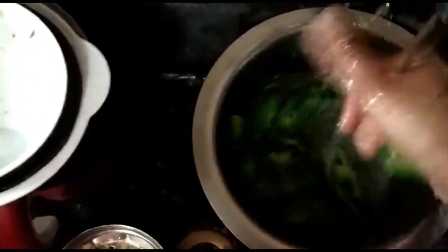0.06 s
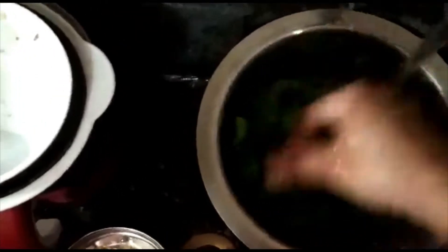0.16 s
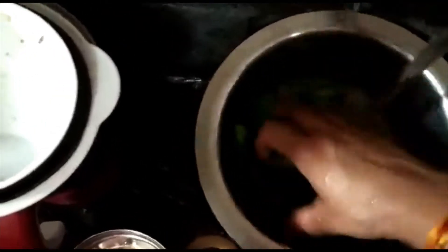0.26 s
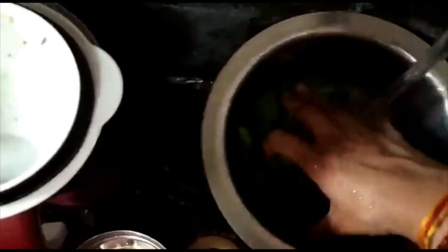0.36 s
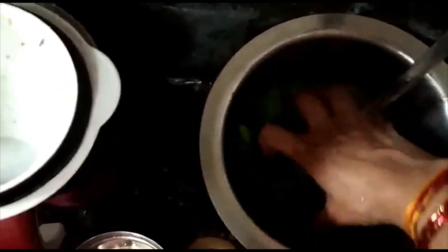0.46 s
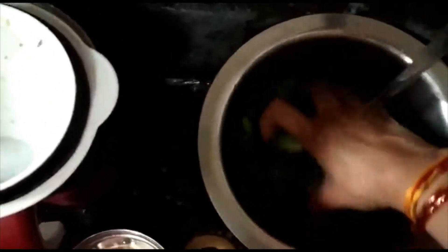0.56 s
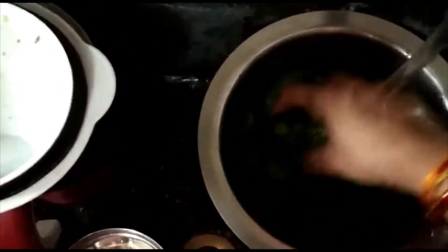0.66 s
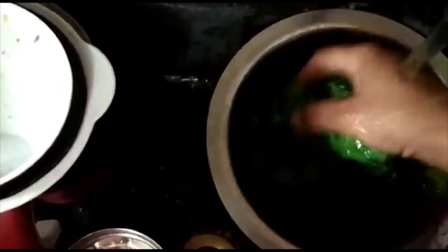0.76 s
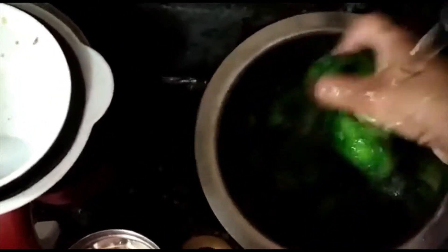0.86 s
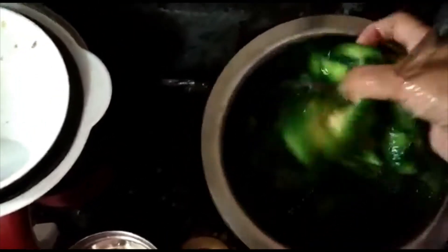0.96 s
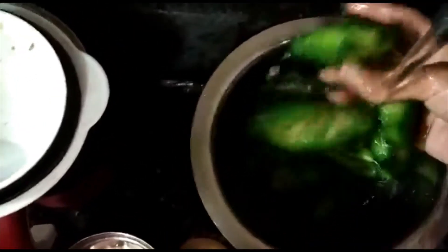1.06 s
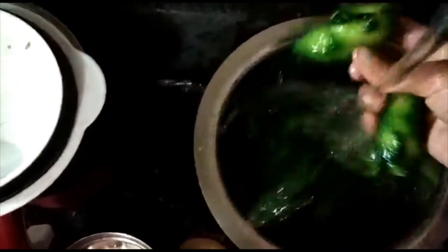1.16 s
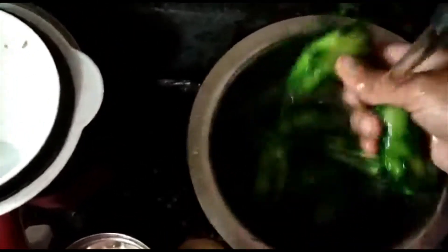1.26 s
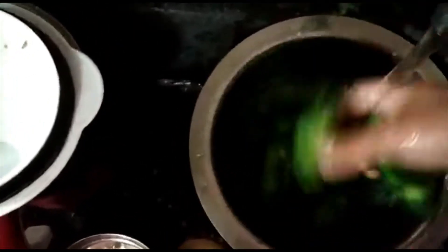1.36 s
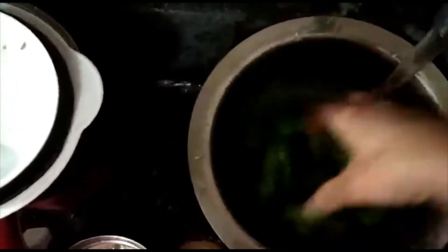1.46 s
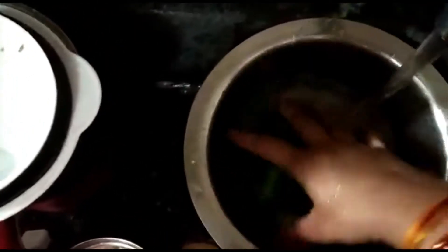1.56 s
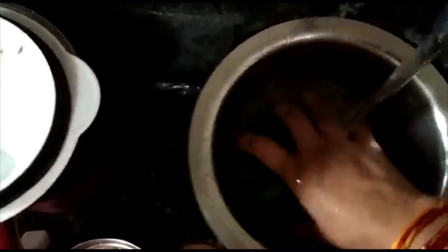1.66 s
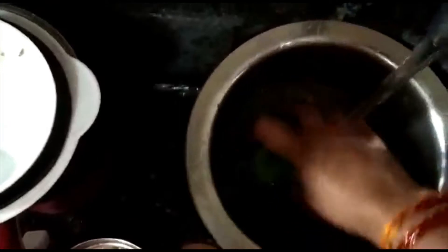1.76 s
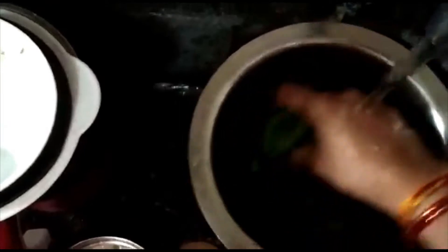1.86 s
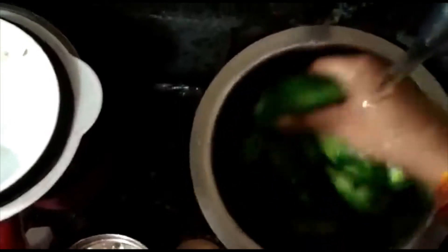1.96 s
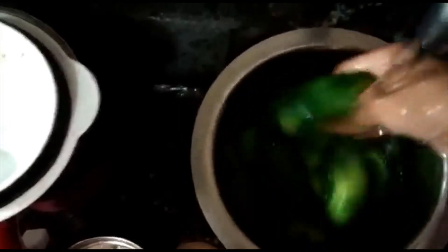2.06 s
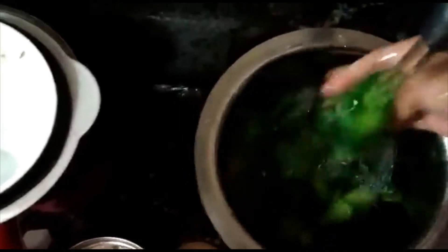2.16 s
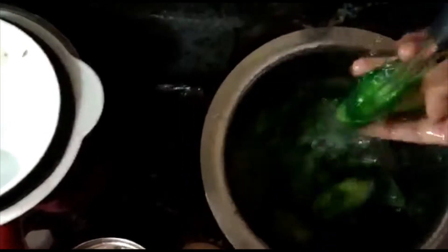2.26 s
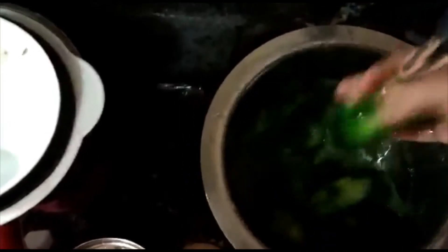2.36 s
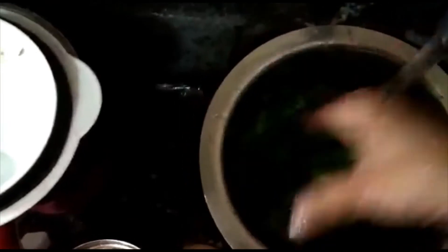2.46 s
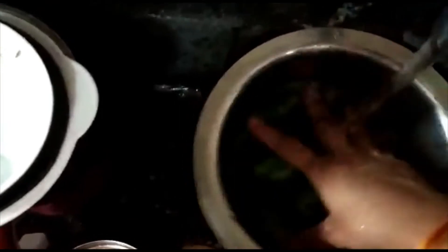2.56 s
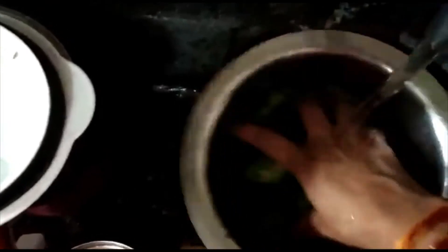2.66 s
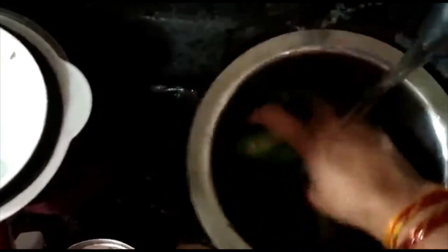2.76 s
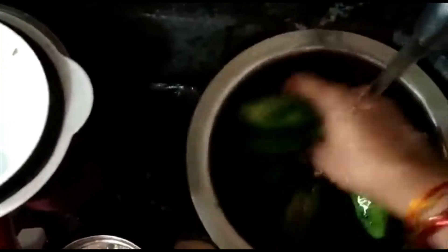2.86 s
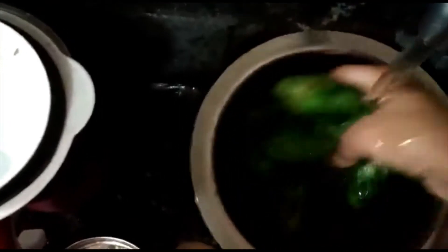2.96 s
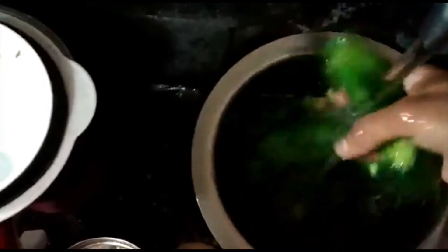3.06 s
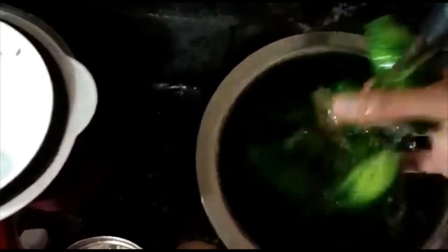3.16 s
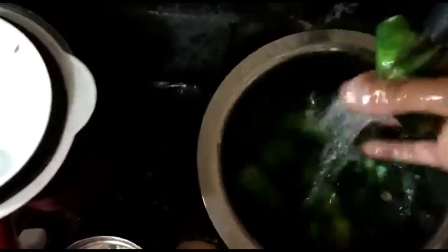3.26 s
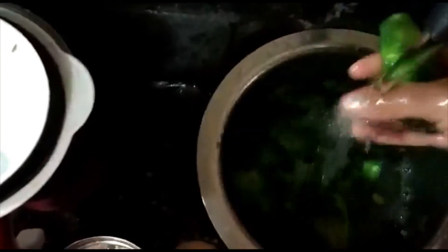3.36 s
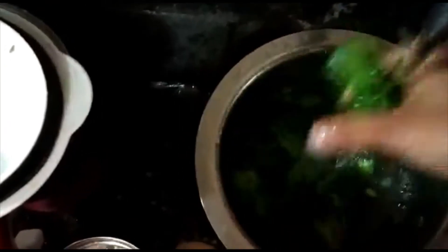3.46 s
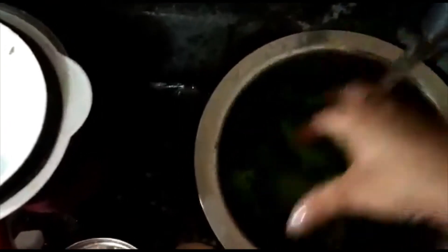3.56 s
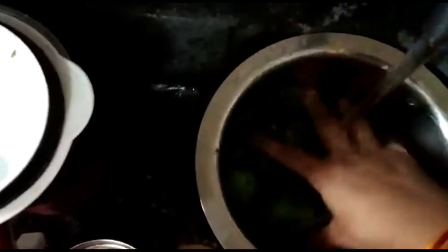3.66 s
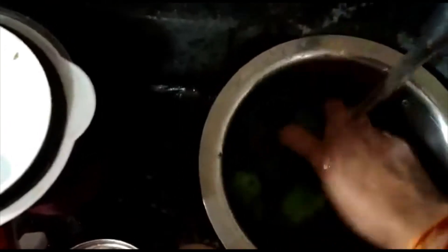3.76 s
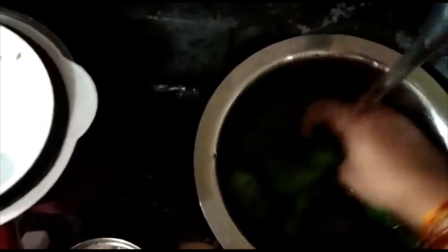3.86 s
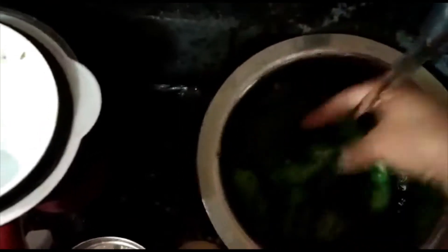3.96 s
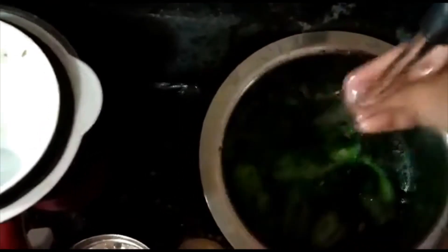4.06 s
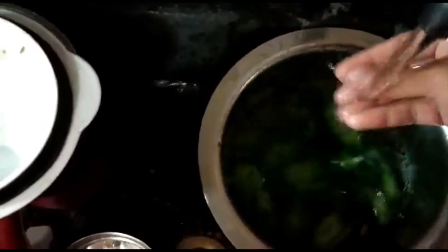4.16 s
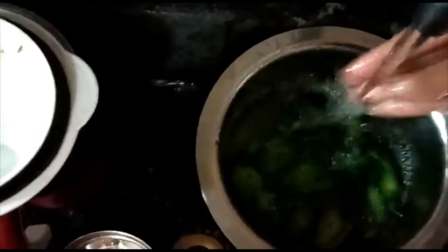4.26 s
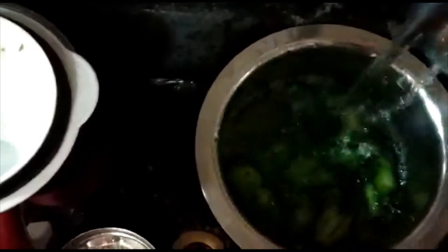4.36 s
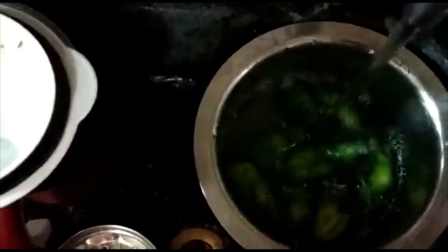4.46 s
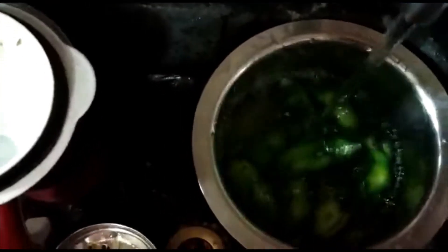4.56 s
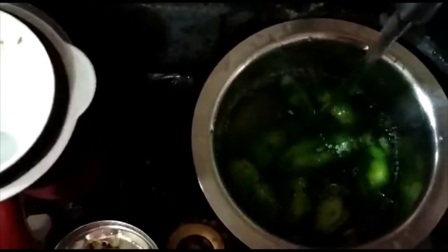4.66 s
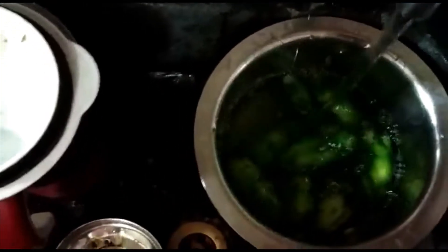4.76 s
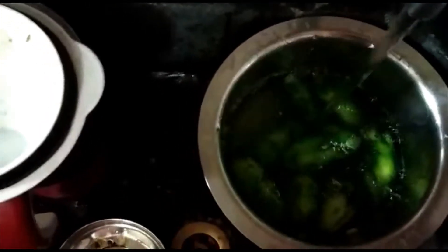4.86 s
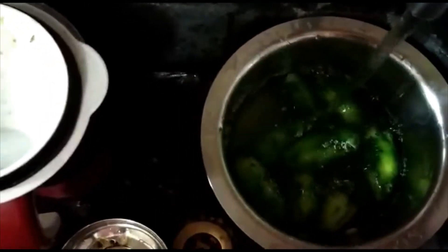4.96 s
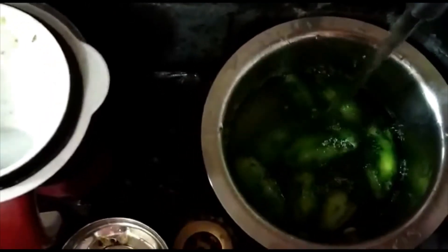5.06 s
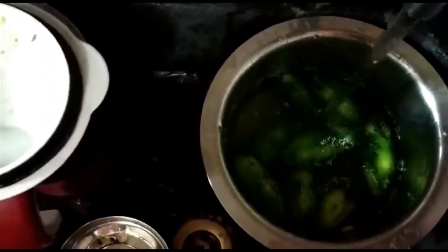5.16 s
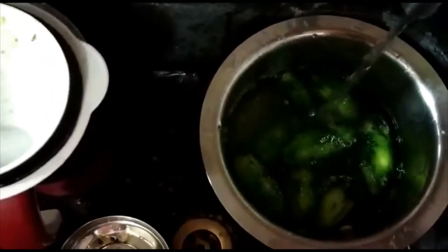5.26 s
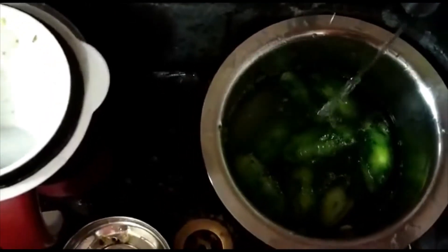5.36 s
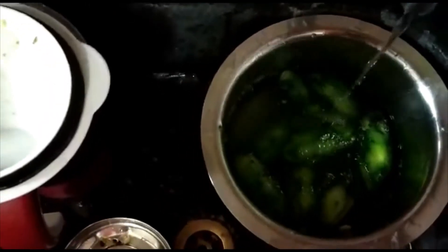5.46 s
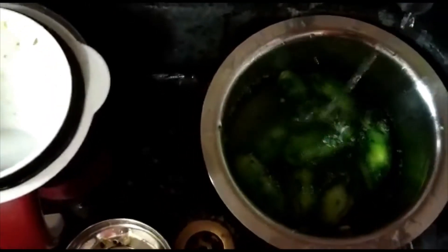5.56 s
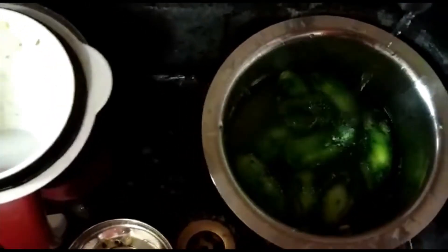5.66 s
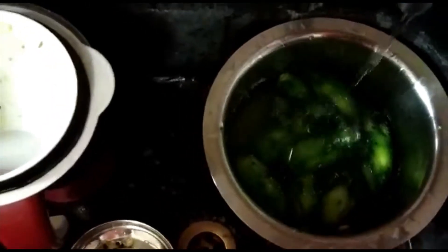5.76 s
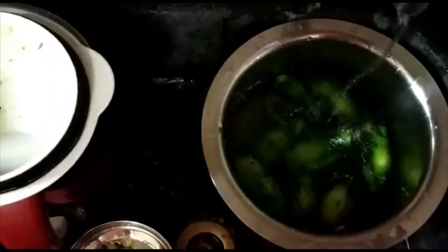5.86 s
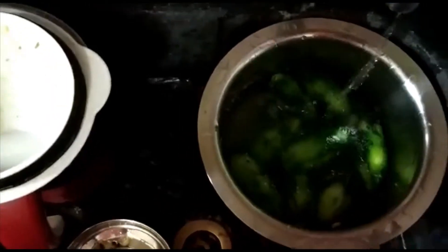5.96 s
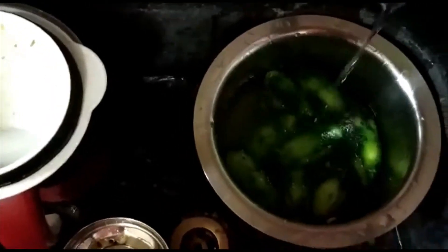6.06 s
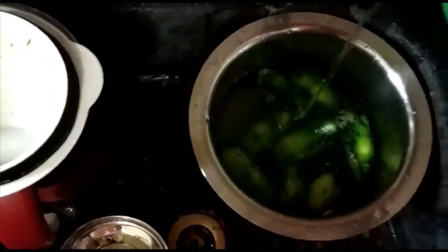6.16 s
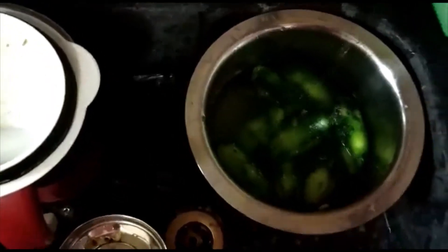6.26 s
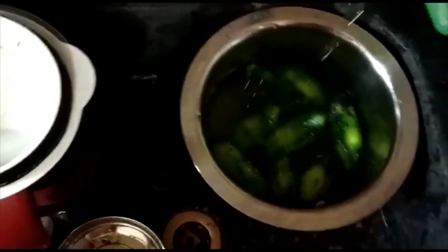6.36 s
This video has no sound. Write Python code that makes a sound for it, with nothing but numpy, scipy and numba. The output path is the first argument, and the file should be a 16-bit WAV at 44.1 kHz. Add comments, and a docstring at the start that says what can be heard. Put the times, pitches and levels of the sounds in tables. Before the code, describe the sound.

Close stereo sound of vegetables being rinsed by hand in a water-filled steel bowl in a kitchen, with a tap running. From 0 s bubbles gurgle, then from 0.3 to 0.8 s there is a flurry of splashes and wet slaps. After a brief lull, scoops resume around 1.1 to 1.5 s. At about 1.74 s a strong, dull, hollow thud comes with a soft ring of the bowl. Stirring goes on in bursts from 2.2 s; at 2.8 to 3.0 s a sharp splash, bright tinks and the clearest metallic ringing stand out. Sloshing, plops and spray continue to about 4.4 s, then fade. The rest is much quieter: thin tap hiss, fizzing bubbles, single plinking drips, hollow low drumming from 4.7 to 5.5 s, a sputter near 5.4 s, near calm around 5.8 s, and sparse bright spatters from 6 s, ending with a light tick at 6.33 s. A low steady rush lies beneath.

```python
"""Water stirred by a hand that rinses green vegetables in a steel bowl under a running tap, close by in a kitchen.
Each scoop throws spray and stirs up bubbles: swarms of short sines that climb in pitch, with noise bursts
for the slaps. Bumps set the bowl ringing as a few dying tones. After about 4.5 s the hand is gone and
the tap runs on: hissing noise, spurts of drops and a hollow drumming on the floating vegetables.
Close echoes from the steel, a short room tail and a low steady rush lie around it."""
import sys
import numpy as np
from scipy import signal
from scipy.fft import rfft, irfft, next_fast_len
from scipy.io import wavfile
from numba import njit

SR = 44100
rng = np.random.default_rng(int(sys.argv[2]) if len(sys.argv) > 2 else 0)


def wav_out(sig):
    """Save sig, one row per channel (or a flat mono array), as 16-bit PCM at SR to the path in sys.argv[1]."""
    wavfile.write(sys.argv[1], SR, np.round(np.clip(np.atleast_2d(sig).T, -1, 1) * 32767).astype(np.int16))


N = 283122
TIME = np.arange(N) / SR
PORT_LAG_S = .00038   # longest delay between the left and right ports, the two places where sound is picked up
LEFT_RIGHT = np.array([[1], [-1]])


def from_db(db):
    """Turn decibels into gain."""
    return 10 ** (np.asarray(db) / 20)


def rms_one(x):
    """Scale to an rms (average strength) of 1."""
    return x / np.sqrt(np.mean(x ** 2) + 1e-20)


def at_hz(points, hz):
    """Read a (pitch_hz, value) table between its points, on a log-frequency axis."""
    table_hz, value = np.transpose(points)
    return np.interp(np.log(np.maximum(hz, 1)), np.log(table_hz), value)


def coloured(x, points, share=1):
    """Filter x with this share of a smooth (pitch_hz, level_db) curve."""
    size = next_fast_len(N + 4096)
    gain = from_db(share * at_hz(points, np.fft.rfftfreq(size, 1 / SR)))
    return irfft(rfft(x, size) * gain, size)[..., :N]


def drift(per_s):
    """Smooth random curve of rms 1 with per_s random points a second, joined by lines."""
    knots = rng.standard_normal(4096)
    return rms_one(np.interp(TIME * per_s, np.arange(len(knots)), knots))


def resonate(x, hz, width_hz):
    """Pass x through one resonance with a gain of about 1 at its top."""
    r = np.exp(-np.pi * width_hz / SR)
    feed = np.array([1, 0, -1]) * (1 - r * r) / 2
    feedback = [1, -2 * r * np.cos(2 * np.pi * hz / SR), r * r]
    return signal.lfilter(feed, feedback, x + 1e-18)


def high_pass(x, hz):
    """Take out what lies below hz."""
    return signal.sosfilt(signal.butter(2, hz, "high", fs=SR, output="sos"), x + 1e-18)


def add(out, s, sound):
    """Mix a sound in at time s."""
    at = max(int(s * SR), 0)
    part = sound[..., :max(N - at, 0)]
    out[..., at:at + part.shape[-1]] += part


def add_placed(out, s, sound, place):
    """Mix a sound in from a place: at 1 it reaches the left port first, at -1 the right."""
    add(out[0], s - place * PORT_LAG_S / 2, sound)
    add(out[1], s + place * PORT_LAG_S / 2, sound)


def surging(rows, column, churn_db, fall_s, rise_s=0.019):
    """Strength over time: each surge swells, holds until its length is over and dies away; powers add to the churn."""
    power, t = np.zeros(N) + from_db(churn_db) ** 2, TIME[:SR // 2]
    for s, length, *levels in rows:
        swell = np.minimum(t / rise_s, 1) * np.exp(-np.maximum(t - length, 0) / fall_s)
        add(power, s, (from_db(levels[column]) * swell) ** 2)
    return np.sqrt(power)


def slops(per_s=90, spread_db=3, fall_s=.006, floor=.4):
    """Gain of water landing in separate slops: each is sudden and dies fast, over a steady share; about rms 1."""
    lands = (rng.random(N) < per_s / SR) * from_db(spread_db * rng.standard_normal(N)) ** 2
    power = signal.lfilter([1], [1, -np.exp(-1 / (fall_s * SR))], lands + 1e-18)
    return np.sqrt(floor + (1 - floor) * power / power.mean())


@njit
def ring_bubbles(length, start, gain, step, cycles, rise):
    """Add up dying sines, each climbing in pitch; start and gain hold one column per port."""
    out = np.zeros((2, length))
    for k in range(len(step)):
        life = int(cycles[k] * 2 * np.pi / step[k]) + 2   # samples until it is 60 dB down
        turn = np.exp(1j * step[k] - np.log(1000) / life)
        climb = np.exp(1j * step[k] * rise / life)
        z = 1 + 0j
        for i in range(life):
            z *= turn
            turn *= climb
            for port in range(2):
                if 0 <= start[k, port] + i < length:
                    out[port, start[k, port] + i] += gain[k, port] * z.imag
    return out


# How bubbles of different pitch compare in strength
# columns: pitch_hz [Hz], level_db [dB per Hz]
WATER_COLOUR = [(59, -57), (100, -27), (140, -17), (277, -17.5), (381, -10.5), (560, -16), (691, -17),
                (1060, -3), (1650, -5), (2420, -3), (3400, -4.5), (4570, -4), (6420, -5.5), (15000, -7.5),
                (16000, -2)]


def bubbles(low_hz, high_hz, per_s, cycles, rise, spread_db=4.4, clump_db=2.2):
    """A swarm of bubbles of random size, pitch and place; bigger ones ring louder, not lower, and clumps ring
    louder still; rms 1."""
    chance = rng.random((80000, 7))[:max(int(per_s * N / SR), 50)]
    when, pitch, size, place, sign, facing, damping = chance.T
    hz = low_hz * (high_hz / low_hz) ** pitch
    at, ports = (when * N).astype(int), np.array([-1, 1])
    size_db = spread_db * np.minimum(-np.log(1 - size), 3) + clump_db * drift(90)[at]
    gain = from_db(size_db + at_hz(WATER_COLOUR, hz)) * hz * np.sign(sign - .5)
    # each bubble reaches the ports at its own delay and balance
    start = at[:, None] + (ports * (place[:, None] - .5) * PORT_LAG_S * SR).astype(int)
    gains = gain[:, None] * (1 + ports * (facing[:, None] - .5))
    # ringing lasts from half to twice the given cycles
    swarm = ring_bubbles(N, start, gains, 2 * np.pi * hz / SR, cycles * 2 ** (2 * damping - 1), float(rise))
    return rms_one(high_pass(high_pass(swarm, low_hz / 2), low_hz / np.sqrt(2)))


# How hard the water churns between strokes
# columns: time_s [s], thrown_drops_db [dB], trapped_air_db [dB]
CHURN = [(0, -26, -25), (.25, -25, -34), (.5, -33, -34), (.8, -32, -31), (1.03, -28, -31), (1.5, -36, -42),
         (1.9, -24.5, -28), (2.1, -31, -38), (2.42, -33, -35.5), (3.0, -28.5, -29), (3.5, -28.5, -32),
         (3.65, -28.5, -40), (3.95, -32, -30.5), (4.35, -31, -52), (4.6, -38.5, -43.5), (5.2, -40.5, -41),
         (5.8, -57, -58), (6.42, -37, -56)]
# The hand pushes, lifts or lets fall a mass of water
# columns: start_s [s], length_s [s], thrown_drops_db [dB], dragged_air_db [dB], slosh_db [dB]
STROKES = [(0.0, 0.01, -44, -19, -37), (0.09, 0.027, -38, -40, -62), (0.278, 0.055, -20.5, -36, -37.5),
           (0.34, 0.12, -27.5, -30, -67), (0.424, 0.059, -22.5, -21.5, -32),
           (0.527, 0.068, -28.5, -25, -43), (0.592, 0.05, -23, -21, -39), (0.655, 0.04, -26, -20.5, -32),
           (0.918, 0.085, -33, -30, -42.5), (1.073, 0.1, -30, -31, -40.5),
           (1.285, 0.086, -43, -25.5, -35.5), (1.347, 0.035, -19.5, -24, -43),
           (1.409, 0.049, -33, -27, -49), (1.526, 0.033, -22, -27, -38), (1.582, 0.099, -31.5, -29, -38.5),
           (1.688, 0.039, -23.5, -17, -34), (1.723, 0.1, -30.5, -50, -32.5),
           (1.832, 0.056, -22.5, -21, -36.5), (1.904, 0.088, -33, -22.5, -47), (2.104, 0.12, -25, -29, -68),
           (2.232, 0.054, -26, -30.5, -65), (2.405, 0.12, -29, -35, -58), (2.518, 0.048, -23, -36, -37.5),
           (2.575, 0.065, -25, -27, -58), (2.621, 0.07, -20, -24, -37.5), (2.718, 0.044, -29, -24, -30),
           (2.797, 0.12, -26, -20.5, -35.5), (2.925, 0.12, -49, -27.5, -47), (2.991, 0.14, -28.5, -34, -39),
           (3.151, 0.06, -24, -25, -43), (3.23, 0.06, -22.5, -36, -42), (3.349, 0.099, -23, -25, -40.5),
           (3.55, 0.033, -27.5, -50, -46.5), (3.707, 0.047, -27, -25, -37),
           (3.768, 0.11, -25, -32.5, -42.5), (3.875, 0.092, -26.5, -30, -40),
           (3.991, 0.17, -56, -31, -41.5), (4.128, 0.075, -25, -36, -42), (4.207, 0.12, -26, -36.5, -41.5),
           (4.379, 0.1, -25, -37, -50)]
# The tap spurts and its jet breaks up (drumming plays these too)
# columns: start_s [s], length_s [s], thrown_drops_db [dB], dragged_air_db [dB], drumming_db [dB]
SPURTS = [(4.675, 0.046, -55, -61, -36.5), (4.73, 0.077, -65, -59, -42.5), (4.979, 0.17, -50, -61, -44.5),
          (5.208, 0.032, -52, -41, -41), (5.286, 0.073, -38, -43, -37.5), (5.38, 0.12, -29, -44.5, -40),
          (5.488, 0.058, -32.5, -69, -62), (5.661, 0.066, -35, -43, -41.5), (5.982, 0.021, -23, -54, -57),
          (6.016, 0.085, -37.5, -43.5, -44), (6.261, 0.045, -31, -39, -38)]
# Bubbles and drops by size
# columns: low_hz [Hz], high_hz [Hz], rate_per_s [1/s], ringing_cycles [typical cycles to fall 60 dB],
# pitch_rise [share of pitch], level_db [dB], air_share [0 follows thrown drops, 1 trapped air]
SWARMS = [(600, 2400, 220, 28, .1, -10, 1), (810, 2825, 1400, 42, .08, -3.8, 1),
          (2804, 4600, 1400, 110, .015, -5.5, .69), (4584, 7000, 1400, 130, .005, -5.5, .27),
          (6900, 15600, 5000, 26, .013, -1, 0)]
# Lone droplets that stand out of the thrown water
# columns: low_hz [Hz], high_hz [Hz], rate_per_s [1/s], ringing_cycles [typical cycles to fall 60 dB],
# pitch_rise [share of pitch], level_db [dB]
DROPLETS = [(1500, 6000, 170, 20, .04, -12.5), (3500, 14000, 140, 9, 0, -11.5)]


def water(slosh_db=-0.5, tumble_db=1.3, tumble_per_s=45):
    """Stirred water: the biggest bubbles follow the slosh, middle ones the trapped air, tiny ones the thrown drops."""
    s, *columns = np.transpose(CHURN)
    drops_db, air_db = [np.interp(TIME, s, level) for level in columns]
    drops = slops() * surging(STROKES + SPURTS, column=0, churn_db=drops_db, fall_s=.018)
    air = surging(STROKES + SPURTS, column=1, churn_db=air_db, fall_s=.013)
    # between strokes the slosh takes on 0.63 of the churn's swing in dB
    slosh = surging(STROKES, column=2, churn_db=-26 + .63 * air_db, fall_s=.02)
    out = from_db(slosh_db) * slosh * bubbles(140, 800, per_s=1300, cycles=14, rise=.15)
    for low_hz, high_hz, per_s, cycles, rise, db, air_share in SWARMS:
        # each size comes and goes on its own as the water tumbles
        level = from_db(db + tumble_db * drift(tumble_per_s))
        strength = air ** air_share * drops ** (1 - air_share)
        out += level * strength * bubbles(low_hz, high_hz, per_s, cycles, rise)
    for low_hz, high_hz, per_s, cycles, rise, db in DROPLETS:
        out += from_db(db) * drops * bubbles(low_hz, high_hz, per_s, cycles, rise)
    return out


# Water slapping on hand, vegetables and surface
# columns: start_s [s], level_db [dB, relative], air_pitch_hz [Hz], air_weight_db [dB], fade_s [s]
SPLASHES = [(0.306, -14, 4300, 2.5, 0.08), (0.344, -4.5, 2340, 0, 0.062), (0.345, -5, 4700, 2.5, 0.025),
            (0.396, -14.5, 4630, 10, 0.027), (0.454, -4.5, 2370, -7, 0.01), (0.4915, -7, 2610, 1.5, 0.043),
            (0.497, -0.5, 4950, 2, 0.012), (0.6, -22, 4300, 4, 0.046), (0.645, 4, 2880, -21, 0.043),
            (0.833, -4, 5750, 0, 0.0042), (1.132, -16.5, 4050, 8, 0.011), (1.279, -3.5, 3570, -7.5, 0.062),
            (1.299, 1.5, 5740, -7, 0.016), (1.401, -5, 3000, -8, 0.039), (1.531, -6.5, 7950, -15, 0.23),
            (1.681, 4.5, 2400, -18, 0.023), (1.812, -12.5, 6100, 17, 0.0043), (1.843, 8, 1920, -9, 0.015),
            (1.928, -3, 4420, -7, 0.023), (2.196, -21, 4420, 4, 0.024), (2.335, 4, 7340, -16, 0.0089),
            (2.499, -13, 3000, 3, 0.014), (2.567, -2, 5960, -15, 0.013), (2.638, -5.5, 2330, -1, 0.013),
            (2.704, -13, 2450, -19, 0.029), (2.803, -16, 2450, 0, 0.0091), (2.809, 14, 4440, -6, 0.0057),
            (2.844, 5, 4500, -5, 0.018), (2.867, 4.5, 2520, -8, 0.012), (3.076, 6, 2560, -11, 0.0062),
            (3.118, -8, 2570, -3, 0.17), (3.251, -8, 4030, 0, 0.02), (3.336, 0.5, 7780, -21, 0.026),
            (3.349, -6.5, 2600, 0, 0.041), (3.435, 1, 8800, -3, 0.016), (3.571, -2.5, 5170, -27, 0.03),
            (3.659, -11, 7060, -22, 0.012), (3.857, 5, 9300, -8, 0.0082), (4.126, -5, 2120, -13, 0.063),
            (4.215, -13, 4560, 4, 0.0089), (4.268, -7, 5700, -10, 0.024), (4.395, -10.5, 3620, -5.5, 0.037),
            (4.46, -19, 7310, 6, 0.031), (5.199, -23, 11000, 4, 0.038), (5.399, -13, 3800, -1.5, 0.012),
            (5.414, -9.5, 5440, 3, 0.015), (5.43, -12, 5000, -9, 0.0077), (5.454, -21, 4450, 9, 0.015),
            (5.563, -17, 9900, -3, 0.019), (5.996, -27, 3460, 3, 0.022), (6.032, -21, 2320, 0, 0.02),
            (6.076, -18, 3480, 2, 0.01), (6.102, -7.5, 9000, -9, 0.013), (6.23, -21.5, 6400, 7.5, 0.008),
            (6.285, -22, 2580, -5, 0.012), (6.331, -20, 890, -3.5, 0.021)]


def splashes(rise_s=0.0032, sharpness=4, spray_db=-13, pocket_db=-5, spray_hz=4000):
    """A slap bursts into fine spray, while the air caught under it fizzes around one pitch."""
    out, t = np.zeros((2, N)), TIME[:SR // 6]
    for s, db, hz, weight_db, length in SPLASHES:
        spray, fizz = rng.standard_normal((2, 2, len(t)))
        # the steel wall reflects each slap from another distance and hollows its tone
        delay = int(rng.uniform(.0003, .0014) * SR)
        spray = rms_one(spray + .8 * np.roll(spray, delay, axis=1))
        burst = from_db(db) * (1 - np.exp(-t / rise_s)) * np.exp(-t / max(length, .002))
        pocket = from_db(pocket_db + weight_db) * rms_one(resonate(fizz, hz, hz / sharpness)) / 2
        add(out, s, burst * (from_db(spray_db) * high_pass(spray, spray_hz) + pocket))
    return out


# Single drops smacking close by
# columns: start_s [s], level_db [dB, relative], pitch_hz [Hz], fade_s [s]
SMACKS = [(0.0815, -6, 1850, .003), (0.4634, -14, 4800, .006), (0.4893, -4.5, 9840, .006),
          (0.6085, -8, 11600, .005), (0.6514, -8, 3190, .004), (1.205, -14, 6800, .004),
          (1.269, -12, 8300, .004), (1.434, -11, 2600, .004), (1.5374, -14, 13000, .006),
          (1.692, -9, 4430, .008), (2.3261, -14, 12900, .002), (2.3426, -10, 13400, .005),
          (2.4796, -8, 7100, .003), (2.518, -2.5, 3670, .0045), (2.6177, -4, 4370, .0018),
          (2.7205, -4.5, 9500, .002), (2.7974, -11.5, 12000, .005), (2.843, -1.5, 4600, .005),
          (3.067, -3.5, 5850, .003), (3.667, -7, 10000, .006), (3.901, -6, 9900, .0012),
          (4.271, -12, 6000, .002), (4.358, -11, 9200, .0025), (4.418, -13, 9000, .003),
          (4.472, -14, 7250, .004), (5.034, -22, 9200, .004), (5.461, -16, 4600, .004),
          (5.5268, -15, 11400, .005), (5.686, -20, 5000, .005), (5.9833, -12, 10300, .004),
          (6.035, -21, 3400, .004), (6.0915, -19, 13000, .005), (6.1414, -20, 13100, .004),
          (6.2925, -15, 10500, .005), (6.294, -16, 3000, .005), (6.3055, -14, 4700, .004),
          (6.3275, -6.5, 4900, .004)]


def smacks(ring_db=3, crack_db=-7, crack_hz=4500, rise_s=.0005):
    """A drop hits with a tiny bright crack and a short ping."""
    out, t = np.zeros((2, N)), TIME[:SR // 25]
    for s, db, hz, length in SMACKS:
        swell = (1 - np.exp(-t / rise_s)) * np.exp(-t / length)
        hit = from_db(db) * rng.standard_normal((2, len(t))) * swell
        crack = from_db(crack_db) * high_pass(hit, crack_hz)
        ping = from_db(ring_db) * resonate(hit, hz, hz / 7)
        add(out, s, crack + ping)
    return out


# Single big bubbles
# columns: start_s [s], level_db [dB, relative], pitch_hz [Hz]
PLOPS = [(0.012, -24, 1190), (0.081, -12, 1810), (0.116, -12, 2120), (0.133, -15, 2300), (0.208, -14, 1444),
         (0.45, -16, 700), (0.547, -19, 733), (0.664, -15, 734), (0.71, -17.5, 1084), (0.749, -20, 914),
         (0.784, -19.5, 554), (0.819, -19, 1210), (0.991, -25, 725), (1.075, -36, 690), (1.204, -21, 1870),
         (1.3, -15.5, 1330), (1.368, -23.5, 725), (1.43, -12.5, 2460), (1.471, -23, 1110),
         (1.605, -16.5, 1920), (1.99, -31, 698), (2.194, -18.5, 1380), (2.347, -19, 876),
         (2.433, -21, 1144), (2.517, -26, 723), (2.645, -21, 1090), (3.009, -15.5, 2620), (3.015, -22, 686),
         (3.064, -13.5, 1150), (3.105, -24, 676), (3.131, -16, 1160), (3.387, -12.5, 953),
         (3.419, -14, 1440), (3.728, -16, 975), (3.755, -25, 904), (3.825, -22, 1250), (3.853, -11.5, 1170),
         (3.89, -22, 805), (4.01, -17.5, 860), (4.063, -15, 2120), (4.227, -25.5, 1110),
         (4.527, -23.5, 1304), (4.699, -35, 850), (4.775, -27, 840), (5.023, -30, 810), (5.082, -30, 840),
         (5.15, -35, 814), (5.293, -35, 497), (5.43, -41, 835), (5.485, -36, 850), (6.075, -35, 690)]


def plops(cycles=20, rise=0.072, ring_db=-4.5, froth_db=-8, froth_s=0.012, froth_sharpness=2.8):
    """A big bubble rings and climbs in pitch as it nears the surface, in a brief froth of bubbles of about its size."""
    out, t = np.zeros((2, N)), TIME[:SR // 6]
    places = rng.uniform(-.8, .8, len(PLOPS))
    for (s, db, hz), place in zip(PLOPS, places):
        age = t * hz / cycles   # the ring falls 20 dB in this many cycles, whatever the bubble's size
        swell = 1 - np.exp(-t * hz)
        phase = 2 * np.pi * np.cumsum(hz * (1 + rise * (np.minimum(age, 1) - .2))) / SR
        add_placed(out, s, from_db(db + ring_db - 20 * age) * swell * np.sin(phase), place)
        width = hz / froth_sharpness
        froth = resonate(resonate(rng.standard_normal((2, len(t))), hz, width), hz, width)
        add(out, s, from_db(db + froth_db) * rms_one(froth) * swell * np.exp(-t / froth_s))
    return out


# Dull blows of vegetables, hand and jet on the water
# columns: start_s [s], level_db [dB, relative], pitch_hz [Hz]
THUDS = [(0.294, -24, 704), (0.436, -28, 408), (0.453, -16, 714), (0.49, -22, 272), (0.55, -23.5, 426),
         (0.665, -18, 406), (0.988, -27, 397), (1.147, -32, 458), (1.704, -24, 400), (1.737, 8, 915),
         (1.741, -3.5, 397), (1.751, -1, 663), (2.514, -21, 454), (2.746, -16, 685), (2.747, -15, 442),
         (3.103, -24, 374), (3.387, -13, 378), (3.667, -17, 624), (3.947, -22, 273), (4.691, -12.5, 391),
         (4.752, -17.5, 404), (5.005, -22, 386), (5.08, -18.5, 384), (5.102, -23, 374), (5.147, -21.5, 380),
         (5.232, -37, 393), (5.255, -28, 418), (5.293, -16.5, 352), (5.351, -23.5, 374),
         (5.401, -16.5, 380), (5.419, -15.5, 378), (5.438, -22, 382), (5.463, -20, 387), (5.488, -18, 400),
         (5.831, -27, 387), (5.935, -28.5, 295), (6.053, -24, 381), (6.253, -23, 387), (6.28, -15.5, 567),
         (6.329, -25, 650)]


def thuds(cycles=19, pocket_db=-7.5, overtone=2.105, overtone_db=-7, churn_db=-19.0, churn_s=0.004,
          churn_hz=750, low_hz=220):
    """A trapped air pocket gives a few low cycles and an overtone, with a brief churn of the water."""
    out, t = np.zeros((2, N)), TIME[:SR // 6]
    places = rng.uniform(-.7, .7, len(THUDS))
    for (s, db, hz), place in zip(THUDS, places):
        phase = 2 * np.pi * hz * t
        tones = np.sin(phase) + from_db(overtone_db) * np.sin(overtone * phase)
        pocket = tones * from_db(-60 * t * hz / cycles) * (1 - np.exp(-2 * t * hz))
        churn = resonate(rng.standard_normal((2, len(t))), churn_hz, churn_hz * 2)
        churn = rms_one(resonate(churn, churn_hz, churn_hz * 2)) * np.exp(-t / churn_s)
        add_placed(out, s, from_db(db + pocket_db) * pocket, place)
        add(out, s, from_db(db + churn_db) * churn)
    return high_pass(out, low_hz)


# The hand plunges in and a big pocket of air gulps downwards in pitch
# columns: start_s [s], level_db [dB, relative], first_pitch_hz [Hz], last_pitch_hz [Hz]
GULPS = [(.295, -33, 280, 190), (.59, -27, 300, 200), (1.655, -30, 280, 200), (1.728, -29, 260, 150),
         (2.19, -34, 270, 190), (2.675, -31, 280, 190), (2.748, -25, 380, 95), (2.785, -28, 160, 105),
         (3.385, -34, 240, 140)]


def gulps(glide_s=0.021, fade_s=0.0089, rise_s=0.004):
    """A large air pocket opens out behind the hand: a short, low, falling note."""
    out, t = np.zeros((2, N)), TIME[:SR // 5]
    for s, db, first_hz, last_hz in GULPS:
        hz = last_hz + (first_hz - last_hz) * np.exp(-t / glide_s)
        note = np.sin(2 * np.pi * np.cumsum(hz) / SR)
        add(out, s, from_db(db) * (1 - np.exp(-t / rise_s)) * np.exp(-t / fade_s) * note)
    return out


# Resonances of the bowl that colour the stirred water and splashes
# columns: pitch_hz [Hz], width_hz [Hz], level_db [dB, against the plain sound]
HOLLOW = [(359, 26, -1.5), (692, 52, 6.5), (840, 25, -3), (1262, 52, -9), (2167, 370, 0), (2470, 24, -5),
          (2704, 45, 5.5), (3157, 46, -3.5), (4120, 130, -5), (4550, 76, 4.5), (4960, 41, 2),
          (5950, 110, -3.5), (7100, 72, -23), (8710, 130, -10), (9460, 200, -10), (9990, 150, -6),
          (10500, 220, -13), (11650, 110, -13)]


def bowl_hollow(wet, level_db=-4.5):
    """The bowl strengthens or cancels some pitches: resonances are added to the plain sound."""
    ringing = sum(from_db(db) * resonate(wet, hz, width) for hz, width, db in HOLLOW)
    return from_db(level_db) * (wet + ringing)


# Vegetables bumping the steel wall
# columns: start_s [s], level_db [dB], first_pitch [factor at the bump],
# last_pitch [factor once the water at the wall has swung back]
BUMPS = [(0.33, -31, 1.02, 1.06), (0.69, -25, 1.08, 1.03), (1.742, -20, 1.05, 1.01), (1.85, -21, 1.04, 1.0),
         (1.94, -23.5, 1.0, .99), (2.874, -12.5, .995, 1.005), (3.015, -18.5, 1.03, 1.09),
         (3.2, -27, 1.01, 1.0), (3.86, -34, 1.0, 1.0)]
# The wall of the filled bowl (wash plays it too)
# columns: pitch_hz [Hz], bumped_db [dB], fade_60db_s [s], bend_share [0-1 of the water's pitch bend], washed_db [dB]
BOWL = [(1039, -1.5, .45, 1, -8), (1104, -9, .45, 1, -11), (1880, -15, .4, .3, -8), (2185, -6, .55, .3, -1),
        (2476, -10, .45, .2, 0), (2748, -13, .6, .2, -.5)]


def bowl(waver=.006, swell_s=.038, swing_s=.09, flutter_db=2.1, rough=.24, rough_per_s=90):
    """Soft bumps ring the steel wall; the swaying water bends its low modes most, and lapping roughens every tone."""
    out, t, sway = np.zeros((2, N)), TIME[:SR], drift(45)
    for hz, mode_db, t60, bend_share, _ in BOWL:
        mode = np.zeros((2, N), complex)
        for s, db, first, last in BUMPS:
            pitch = last + (first - last) * np.exp(-t / swing_s)
            bend = (pitch * (1 + waver * np.interp(s + t, TIME, sway))) ** bend_share
            # higher modes can reach the two ports further out of step
            apart = LEFT_RIGHT * np.pi * hz * PORT_LAG_S * rng.uniform(0, 1 / 2)
            level = from_db(db + mode_db - 60 * t / t60) * (1 - np.exp(-t / swell_s))
            phase = 2 * np.pi * np.cumsum(hz * bend) / SR + apart
            add(mode, s, level * np.exp(1j * phase))
        lapping = 1 + rough * np.array([drift(rough_per_s) + 1j * drift(rough_per_s) for port in range(2)])
        out += np.imag(mode * lapping) * from_db(flutter_db * drift(40.35))
    return out


# Water pours off the hand down the steel wall and keeps it singing
# columns: start_s [s], length_s [s], level_db [dB]
WASHES = [(.35, .14, -41), (1.845, .16, -35), (2.63, .06, -39), (2.83, .12, -34.5), (3.0, .3, -36.5),
          (3.36, .08, -37), (3.75, .25, -43)]


def wash(width_hz=38, fall_s=0.051, side=0.95):
    """Running water keeps nudging the modes of the wall, so each sings as a narrow, restless band."""
    song = np.zeros((2, N))
    for hz, _, _, _, db in BOWL:
        nudges = rng.standard_normal((2, N))
        song += from_db(db) * rms_one(resonate(resonate(nudges, hz, width_hz), hz, width_hz))
    mid, apart = rms_one(song)
    level = surging(WASHES, column=0, churn_db=-83, fall_s=fall_s)
    return level * (mid + side * apart * LEFT_RIGHT)


# Light hard taps on the steel rim, and bangles on the wrist clinking (2.862 and 2.876 s) # columns: start_s
# [s], level_db [dB], loudest_pitch_hz [Hz]
TINKS = [(2.8445, -19, 4700), (2.862, -25, 9500), (2.876, -24.5, 8600), (6.3285, -24, 5000)]
# The high modes of the rim and the bangles # columns: pitch_hz [Hz], level_db [dB]
HIGH_MODES = [(4480, -10), (4996, -6.5), (6030, -18), (7310, 0), (8470, -2), (9210, -6), (9950, -1), (11800, -7)]


def tinks(spread_octaves=.3, t60_s=.27):
    """A tap or clink rings the high steel modes, most of all those near one pitch."""
    out, t = np.zeros((2, N)), TIME[:SR // 3]
    for s, db, centre_hz in TINKS:
        for hz, mode_db in HIGH_MODES:
            weight = np.exp(-(np.log2(hz / centre_hz) / spread_octaves) ** 2 / 2)
            ring = from_db(db + mode_db - 60 * t / t60_s) * np.sin(2 * np.pi * hz * t)
            add_placed(out, s, weight * ring, rng.uniform(-1, 1))
    return out


# The colour of the tap's smooth jet
# columns: pitch_hz [Hz], level_db [dB per Hz, relative]
TAP_COLOUR = [(250, -30), (500, -5), (1500, -4), (2600, -7.5), (4500, -4.5), (7000, -3.5), (11000, -1.5),
              (16000, 0)]


def tap(hiss_db=-38, fizz_db=-47.5, sputter_db=0.5, pan_db=1):
    """The jet hisses as it enters the water and trails an uneven fizz of small ringing bubbles."""
    pan = from_db(pan_db * LEFT_RIGHT / 2)   # the jet lands nearer the left port
    hiss = rms_one(coloured(rng.standard_normal((2, N)), TAP_COLOUR))
    fizz = bubbles(low_hz=2400, high_hz=15000, per_s=900, cycles=70, rise=.01)
    fizz = rms_one(from_db(sputter_db * drift(25)) * fizz)
    return pan * (from_db(hiss_db) * hiss + from_db(fizz_db) * fizz)


# The air pocket that the jet drives in among the vegetables
# columns: pitch_hz [Hz], width_hz [Hz], level_db [dB, relative]
JET_POCKET = [(388.6, 23, 9.5), (850, 100, -1.5), (1170, 200, -9.5)]


def drumming(per_s=500, idle_db=-56, fall_s=0.016, level_db=-3.0, gurgle_db=-6, side=0.7):
    """Beads of the broken jet make the air pocket under it ring hollowly; loose bubbles gurgle off it."""
    beads = rng.standard_normal((2, N)) * (rng.random(N) < per_s / SR)
    mid, apart = rms_one(sum(from_db(db) * resonate(beads, hz, width) for hz, width, db in JET_POCKET))
    pocket = mid + side * apart * LEFT_RIGHT
    gurgle = bubbles(low_hz=253, high_hz=690, per_s=120, cycles=10, rise=.15)
    level = from_db(level_db) * surging(SPURTS, column=2, churn_db=idle_db, fall_s=fall_s)
    return level * (pocket + from_db(gurgle_db) * gurgle)


# Stray drops from the tap fall into open water
# columns: start_s [s], level_db [dB], pitch_hz [Hz], ringing_cycles [cycles to fall 25 dB],
# slap_db [dB against the ring]
DRIPS = [(4.676, -24, 2930, 35, -5), (4.676, -22, 1700, 14, -3), (4.755, -28, 1750, 14, -4),
         (4.860, -24, 2900, 42, -19), (5.099, -23, 1500, 22, -5), (5.351, -28, 2190, 36, -6),
         (6.005, -23, 3500, 90, -14), (6.08, -24, 3500, 30, -6)]


def drips(rise=.03, slap_s=.004):
    """A falling drop slaps the surface and leaves one clear bubble that plinks upwards."""
    out, t = np.zeros((2, N)), TIME[:SR // 12]
    places = rng.uniform(-.25, .25, len(DRIPS))
    for (s, db, hz, cycles, slap_db), place in zip(DRIPS, places):
        age = t * hz / cycles
        phase = 2 * np.pi * np.cumsum(hz * (1 + rise * np.minimum(age, 1))) / SR
        ring = np.sin(phase) * from_db(-25 * age) * (1 - np.exp(-20 * age))
        slap = rms_one(resonate(rng.standard_normal(len(t)), hz, hz)) * np.exp(-t / slap_s)
        add_placed(out, s, from_db(db) * (ring + from_db(slap_db) * slap), place)
    return out


# The hand presses the bowl down on the counter
# columns: time_s [s, half a fade after the start], peak_db [dB]
KNOCKS = [(.339, -60), (.599, -51), (1.708, -49), (2.795, -43), (3.389, -58), (3.669, -59)]


def knocks(centre_hz=48, width_hz=45, fade_s=0.037):
    """The counter takes the weight of the bowl with a dull, very low bump."""
    out, t = np.zeros((2, N)), TIME[:SR // 4]
    edges_hz = [centre_hz - width_hz / 2, centre_hz + width_hz / 2]
    band = signal.butter(2, edges_hz, "band", fs=SR, output="sos")
    for s, db in KNOCKS:
        push = signal.sosfilt(band, rng.standard_normal((2, len(t))) * np.exp(-t / fade_s))
        add(out, s - fade_s / 2, from_db(db) * push / np.abs(push).max())
    return out


def wall_echoes(x, count=3, shortest_s=.0009, longest_s=.005, echo_db=-3.5, low_hz=1800, wander_per_s=7):
    """The water lands on changing spots in the bowl; each has its own close echoes and so its own hollow tone."""
    weights = np.array([np.exp(2 * drift(wander_per_s)) for spot in range(count)])
    weights /= np.sqrt(np.sum(weights ** 2, axis=0))
    # longer waves bend round the bowl, so only the treble echoes
    treble = signal.sosfiltfilt(signal.butter(2, low_hz, "high", fs=SR, output="sos"), x)
    out, gain = treble.copy(), from_db(echo_db)
    for weight in weights:
        for port in range(2):
            echoes = np.zeros(N)
            for delay_s in rng.uniform(shortest_s, longest_s, size=count):
                add(echoes, delay_s, gain * rng.choice([-1, 1]) * treble[port])
            out[port] += weight * echoes
    return x - treble + out / np.sqrt(1 + count * gain ** 2)


def kitchen(x, t60_s=0.24, level_db=-6.5):
    """Dense reflections from sink and walls, different at each port, duller than the direct sound."""
    t = TIME[:SR // 2]
    tail = rng.standard_normal((2, len(t))) * from_db(-60 * t / t60_s) * (t > .002)
    tail /= np.sqrt(np.sum(tail ** 2, axis=1, keepdims=True))
    tail = signal.sosfilt(signal.butter(1, 7000, fs=SR, output="sos"), tail)
    return from_db(level_db) * signal.fftconvolve(x, tail, axes=1)[:, :N]


# The colour of the steady kitchen background
# columns: pitch_hz [Hz], level_db [dB per Hz, relative]
BACKGROUND_COLOUR = [(18, -85), (30, -55), (54, -72), (87, -10), (119, -10), (144, 5), (240, -3),
                     (297, -14), (322, 0), (432, 1), (571, -3), (996, -32), (1500, -17), (1950, -77),
                     (3300, -120)]


def background(rush_db=-53.5, width=0.57, hum_hz=237, hum_db=-59.5):
    """A low steady rush of noise, mostly alike at both ports, and a faint hum."""
    mid, side = rms_one(coloured(rng.standard_normal((2, N)), BACKGROUND_COLOUR))
    hum = from_db(hum_db) * np.sqrt(2) * np.sin(2 * np.pi * hum_hz * TIME)
    return from_db(rush_db) * (mid + width * side * LEFT_RIGHT) + hum


def scene():
    """Water coloured by the bowl, its plops, thuds and ringing wall, in the kitchen with the tap running."""
    wet = bowl_hollow(wall_echoes(water() + splashes()))
    close = wet + smacks() + plops() + drips() + thuds() + gulps() + drumming()
    steel = bowl() + tinks() + wash()
    return close + steel + kitchen(close) + tap() + knocks() + background()


# Left port against right port; each takes half of the difference
# columns: pitch_hz [Hz], left_over_right_db [dB]
PORT_BALANCE = [(200, 0), (400, .5), (700, -3.5), (1300, 0), (2400, -.5), (4400, .3), (8100, 5.8),
                (15000, 11)]


def record(dry, cutoff_hz=15750):
    """The left port hears more treble than the right; peaks are rounded and the top is cut."""
    left = coloured(dry[0], PORT_BALANCE, 1 / 2)
    right = coloured(dry[1], PORT_BALANCE, -1 / 2)
    rounded = np.tanh(np.array([left, right]))
    return signal.sosfilt(signal.ellip(12, .1, 80, cutoff_hz, fs=SR, output="sos"), rounded)


dry = scene()
out = record(dry)
wav_out(out)
```